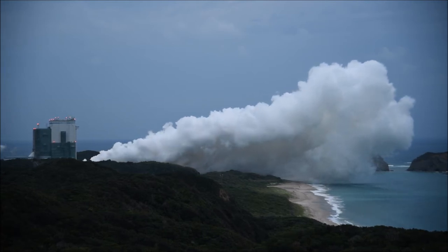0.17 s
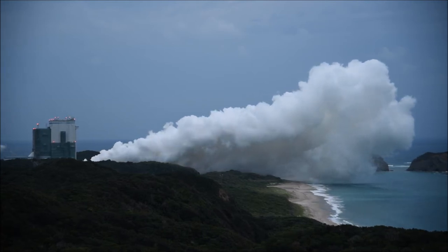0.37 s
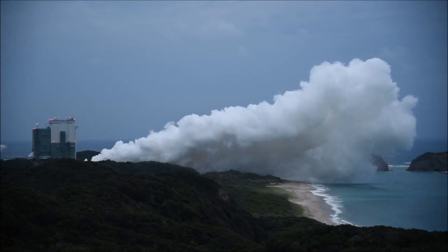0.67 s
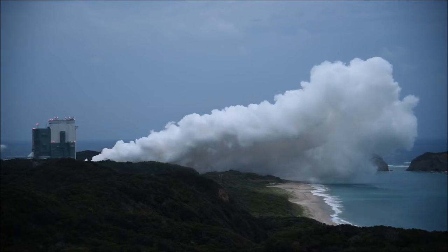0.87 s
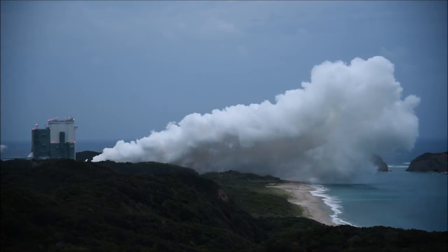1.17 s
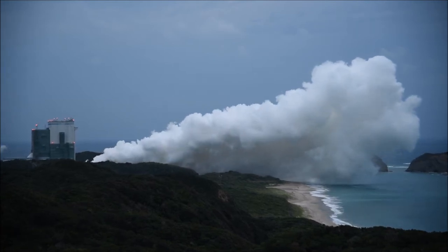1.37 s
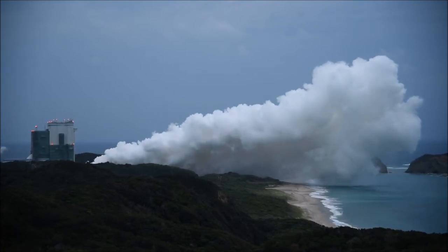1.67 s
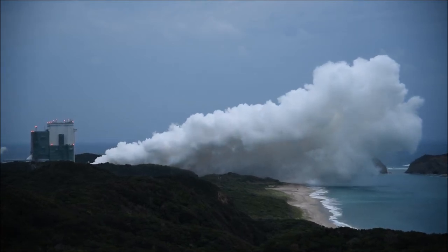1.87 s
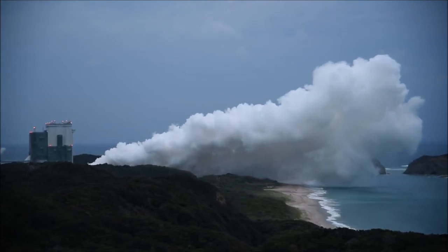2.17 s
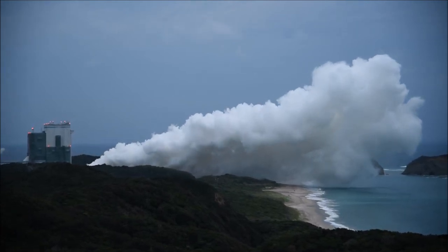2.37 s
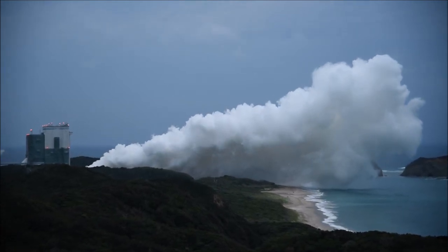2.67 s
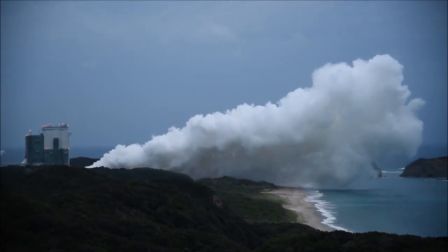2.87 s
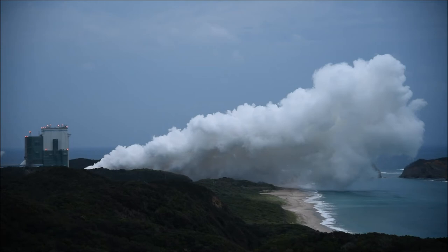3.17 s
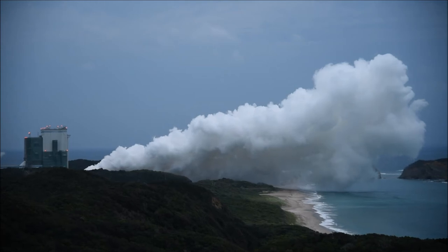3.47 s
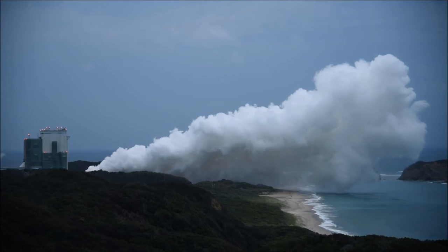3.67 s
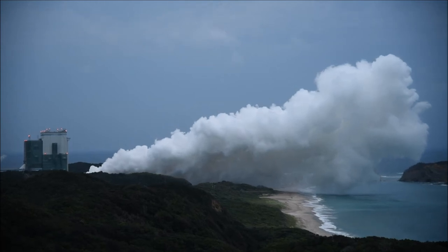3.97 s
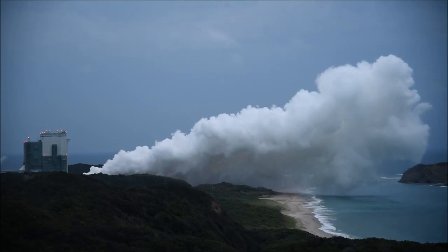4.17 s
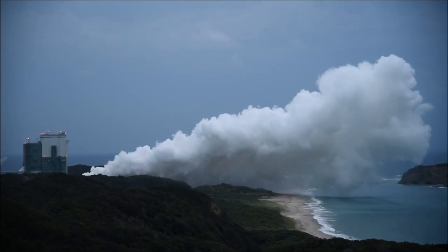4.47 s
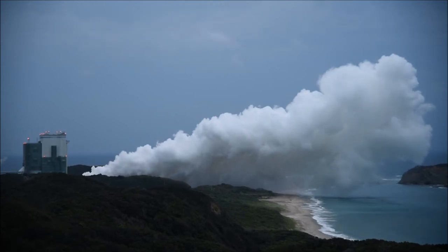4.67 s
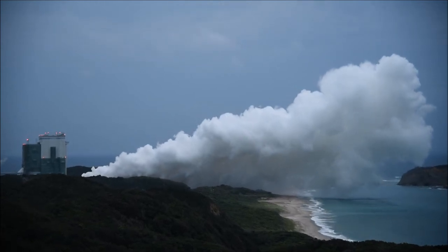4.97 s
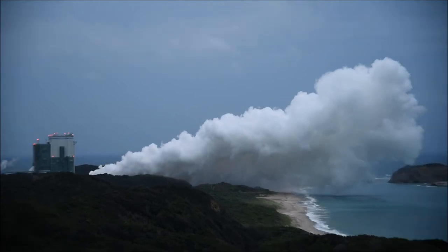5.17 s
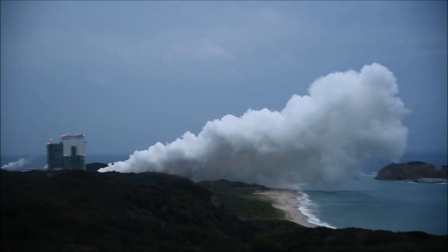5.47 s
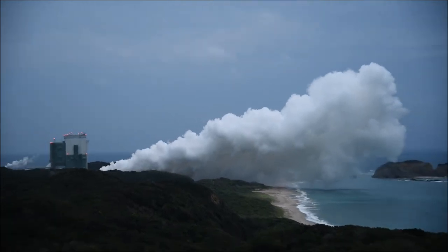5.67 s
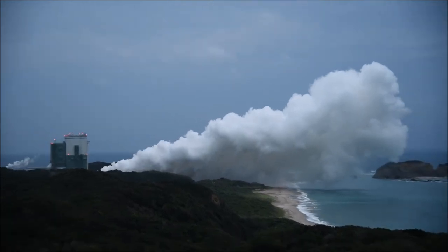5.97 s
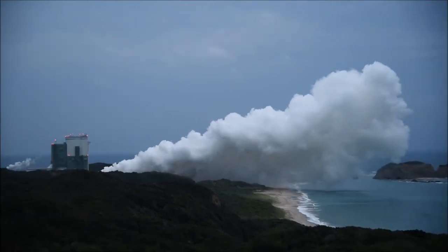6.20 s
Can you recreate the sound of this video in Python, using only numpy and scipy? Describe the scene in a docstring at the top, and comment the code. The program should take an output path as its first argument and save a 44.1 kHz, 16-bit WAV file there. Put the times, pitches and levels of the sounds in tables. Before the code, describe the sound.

Steady, loud, distant jet roar fills the whole stretch, starting and ending mid-burn. The low boom swells and sinks while the rushing body flutters finely, with a few tiny cracks in the first four seconds. Almost buried are high insect buzzing and trills, small grass snaps, faint hiss and a thin electronic whine. Open air, compact stereo microphone, mono bass and automatic level control.

```python
"""0 s: a rocket engine roars on a far test stand, dulled by the air, doubled by a bounce off near ground;
a katydid, two crickets, a faint high hiss and the camera's thin whine run under it. 0.1-4 s: steep fronts crack.
1.3-5.9 s: grass rustles and snaps. 5.7-6 s: the whine grows. 6.26 s: the katydid stops.
Jet, grass and hiss are shaped noise, cracks are shaped impulses, insects are chirps, the whine is a sine.
Gain control holds the roar level throughout."""
import sys
import numpy as np
from scipy import signal
from scipy.fft import rfft, irfft, next_fast_len
from scipy.io import wavfile
from scipy.ndimage import uniform_filter1d, minimum_filter1d, map_coordinates

SR = 44100
rng = np.random.default_rng(int(sys.argv[2]) if len(sys.argv) > 2 else 0)


def persist_wave(psi):
    """Save psi, clipped to +-1, as 16-bit WAV."""
    counts = np.round(np.clip(psi, -1, 1) * 32767).astype(np.int16)
    wavfile.write(sys.argv[1], SR, np.atleast_2d(counts).T)


N = 279594


def amp(db):
    """dB to amplitude factor."""
    return 10 ** (np.asarray(db) / 20)


def unit(x):
    """x at rms 1."""
    return x / np.sqrt(np.mean(x ** 2) + 1e-20)


def along(points, hz):
    """Each column after the frequency, read on a log axis."""
    f, *cols = np.transpose(points)
    return [np.interp(np.log(hz + 1), np.log(f + 1), c) for c in cols]


def curves(rows):
    """One value per sample for each column after the time."""
    s, *cols = np.transpose(rows)
    return [np.interp(np.arange(N) / SR, s, c) for c in cols]


def wobble(rate_hz):
    """Smooth random curve through rate_hz knots a second."""
    knots = rng.standard_normal(int(N * rate_hz / SR) + 4)
    return map_coordinates(knots, [np.arange(N) * rate_hz / SR])


def filtered(x, response):
    """x times a complex response of frequency."""
    m = next_fast_len(N + 8192)
    return irfft(rfft(x, m) * response(np.fft.rfftfreq(m, 1 / SR)), m)[..., :N]


def shaped(x, spectrum, floor_hz=0.79):
    """x through a spectrum closed to -120 dB at both ends."""
    closed = [(floor_hz, -120)] + list(spectrum) + [(SR / 2, -120)]
    return filtered(x, lambda hz: amp(along(closed, hz)[0]))


def coloured(x, spectrum):
    """Shaped x at rms 1."""
    return unit(shaped(x, spectrum))


def turbulence(patchy_db):
    """Two unrelated noises sharing time-frequency patches of random gain."""
    z = signal.stft(rng.standard_normal((2, N)), nperseg=1024)[2]
    field = rng.standard_normal(z.shape[1:])
    field = uniform_filter1d(field, size=10, axis=0)
    field = uniform_filter1d(field, size=12, axis=1)
    return signal.istft(z * amp(patchy_db * unit(field)), nperseg=1024)[1][:, :N]


# jet strength on arrival: t/s, level/dB
THRUST = [(0, -5.5), (1.4, -7.5), (2.2, -7), (3.3, -4.5), (3.8, -6), (4.3, -7), (5.2, -9), (5.7, -10.5),
          (6.34, -7)]
# ground path strength: t/s, level/dB
BOUNCE_LEVEL = [(0, -12.5), (.8, -15.5), (1.5, -11), (2.5, -10), (3.3, -13), (4, -10), (4.6, -21),
                (5.3, -12.5), (6.34, -21)]


def jet():
    """Roar as a direct and a scattered wave; a delayed, duller ground path combs the spectrum."""
    delay_s, low_hz, high_hz = 0.002558, 297, 1880
    thrust_db, = curves(THRUST)
    bounce_db, = curves(BOUNCE_LEVEL)
    roar = upper_roar() + deep_roar() + boom()

    def ground(hz):
        """Delay; the middle of the roar returns best."""
        lowpass = 1 / (1 + (hz / high_hz) ** 4)
        highpass = 1 / (1 + (low_hz / (hz + 1)) ** 4)
        return np.exp(-2j * np.pi * hz * delay_s) * lowpass * highpass

    echo = filtered(roar, ground)
    return amp(thrust_db) * (amp(-19.5) * (roar + amp(bounce_db) * echo) + cracks())


# band spectra: f/Hz, level/dB per Hz
BODY_SPECTRUM = [(240, -32.5), (320, -2.5), (440, 0.5), (520, -3), (610, -1), (660, -4.5), (830, -5.5),
                 (950, -12.5), (1300, -27)]
RUSH_SPECTRUM = [(650, -39.5), (900, -1), (1200, 1.5), (1400, -0.5), (1630, 0), (1780, -3.5), (2000, -5.5),
                 (2300, -9), (3200, -41.5)]
SIZZLE_SPECTRUM = [(1700, -12.5), (2300, -2.5), (2700, 1), (3300, -3), (4000, -11), (5000, -24.5),
                   (6000, -38), (7000, -49.5), (9000, -78.5)]
# upper band drift: t/s, lower body level/dB, upper body level/dB, rush level/dB, sizzle level/dB
UPPER_DRIFT = [(0, 0, -0.5, -0.5, -11), (.6, -1, -1, -1, -12.5), (1.1, -2, 2.5, -1.5, -9),
               (1.6, -1, -0.7, -0.5, -12.5), (2.3, -2, 3, 0.9, -12), (2.7, 1.5, -1, 0, -12.5),
               (3.1, 2, 0.5, 1.5, -13), (3.6, 2.2, 0, 0.5, -10), (4.3, -4.5, -0.5, -4.5, -15),
               (4.7, -2, 0.6, -1.7, -13.5), (5.2, -1, 0.5, -2, -12.5), (5.8, 2, 1.5, -2, -13),
               (6.34, -3.5, -1.5, -5, -16)]


def upper_roar():
    """Fine turbulence in body, rush and sizzle; sparse steep shocks add crackle to the top two."""
    split_hz, shocks_per_s = 550, 150
    lower_db, upper_db, rush_db, sizzle_db = curves(UPPER_DRIFT)
    eddies = amp(0.85 * wobble(120) + 0.082 * wobble(25))  # shakes all upper bands together
    fine = eddies * turbulence(patchy_db=0.5)
    hits = rng.random(N) < shocks_per_s / SR
    shocks = unit(hits * rng.exponential(1, N) * rng.choice([-1, 1], N))

    body = coloured(fine, BODY_SPECTRUM)
    below = filtered(body, lambda hz: 1 / (1 + (hz / split_hz) ** 12))
    rush = coloured(fine + amp(-13.5) * shocks, RUSH_SPECTRUM)
    sizzle = coloured(fine + amp(-10.5) * shocks, SIZZLE_SPECTRUM)
    roar = amp(lower_db) * below + amp(upper_db) * (body - below)
    return roar + amp(rush_db) * rush + amp(sizzle_db) * sizzle


# band spectra: f/Hz, level/dB per Hz
DEEP_SPECTRUM = [(15, -33), (25, -20.5), (33, -5.5), (41, 4), (50, -8), (60, 5.5), (75, -16.5),
                 (100, -28.5)]
GROWL_SPECTRUM = [(100, -36.5), (132, -0.5), (160, -4), (190, -4.5), (215, -20.5), (270, -39.5)]
LOW_SPECTRUM = [(150, -27), (195, 1), (260, 4), (315, -0.5), (350, -11.5), (450, -39.5)]
# low band swell: t/s, deep rumble level/dB, growl level/dB, low roar level/dB
LOW_SWELL = [(0, 1, -5, 0.5), (.4, -6.5, -11.5, -7.5), (.9, -2.5, -8.5, -5.5), (1.6, -4.5, -7.5, -8.5),
             (2.2, -3.5, -4.5, -5.5), (2.8, -13, -3.5, -2.5), (3.3, -7, -1.5, -2), (4.4, -11.5, -6, -7.5),
             (4.8, -5, -4.5, -8), (5.2, -7.5, -12, -10.5), (6.0, 0.5, -13, -9.5), (6.34, 1, -10.5, -7.5)]


def deep_roar():
    """Coarse turbulence: rumble, growl and low roar swell and sink separately."""
    spectra = DEEP_SPECTRUM, GROWL_SPECTRUM, LOW_SPECTRUM
    roar = 0
    for level_db, spectrum in zip(curves(LOW_SWELL), spectra):
        roar = roar + amp(level_db) * coloured(turbulence(patchy_db=0.6), spectrum)
    return roar


# boom spectra, lower and higher form: f/Hz, level/dB per Hz
BOOM_LOWER = [(50, -36), (70, -0.5), (100, 2.5), (114, 0.5), (132, -8), (170, -40)]
BOOM_HIGHER = [(60, -33), (85, -3), (113, 4), (124, -2), (138, -16.5), (180, -35)]
# boom surge and drift: t/s, level/dB, higher-form power share/0-1
BOOM_DRIFT = [(0, -5.5, 0.6), (.6, -2.5, 0), (1.2, 1, 0.37), (1.7, 0.5, 0.75), (2.3, 1.5, 0.46),
              (3, -1.5, 0.05), (3.3, 0.5, .2), (3.8, 2.5, 0.21), (4.15, -1, .2), (4.4, -3, 0.5),
              (4.65, -0.5, 0.96), (4.85, -2.5, 0.95), (5.05, -0.5, 0.7), (5.18, 3, 0.97), (5.3, 4.5, 1),
              (5.7, -1, 0.53), (6.05, -0.5, 0.2), (6.34, -8.5, 0.25)]


def boom():
    """Narrow low noise that surges and crossfades at equal power between two spectra."""
    level_db, share = curves(BOOM_DRIFT)
    share = np.clip(share, 0, 1)
    lower = coloured(turbulence(patchy_db=3.0), BOOM_LOWER)
    higher = coloured(turbulence(patchy_db=0.7), BOOM_HIGHER)
    return amp(level_db) * (np.sqrt(1 - share) * lower + np.sqrt(share) * higher)


# steepest fronts: t/s, level/dB
CRACK_TIMES = [(0.0983, -7), (1.4057, -3), (1.5016, -5), (1.8124, -6), (3.016, -6), (3.1095, -4),
               (3.2284, -4), (3.693, -4), (4.022, -4)]
# front spectrum: f/Hz, level/dB
FRONT_SPECTRUM = [(1000, -26.5), (2000, 3.5), (3500, 4), (5000, -13.5), (6500, -23), (8000, -40),
                  (10000, -70)]


def cracks():
    """Single steep fronts as shaped impulses: faint ticks above the roar."""
    blows = np.zeros(N)
    s, db = np.transpose(CRACK_TIMES)
    blows[np.round(s * SR).astype(int)] = -amp(db)
    return shaped(blows, FRONT_SPECTRUM, floor_hz=0.97)


# microphone pair: f/Hz, scattered re direct level/dB, left minus right level/dB, left lead/rad
MIC_PAIR = [(420, -39, -1.5, 0.032), (900, -20, 1, 0.21), (1300, -15, -1, 0.19), (1750, -12, -3, 0.59),
            (2100, -5, -3, 0.41), (3060, -10.5, 1, 1.38), (3200, -20.5, 4.5, 0.77), (3980, -9.5, 0.8, 0.38),
            (4900, -8, -2.5, 0.9), (5500, -4.5, 0, 0.67), (7000, -3, -4.5, 0.3)]


def heard(waves):
    """Direct sound reaches both ports alike, up to balance and lead; scattered sound splits them."""
    direct, scattered = waves

    def scatter(hz):
        return amp(along(MIC_PAIR, hz)[0])

    def tilt(hz):
        _, balance_db, lead_rad = along(MIC_PAIR, hz)
        return amp(balance_db / 2) * np.exp(.5j * lead_rad)

    split = filtered(scattered, scatter)
    left = filtered(direct + split, tilt)
    right = filtered(direct - split, lambda hz: 1 / tilt(hz))
    return np.array([left, right])


def strokes(count, duty, top_hz, fall_hz, bend, scatter_db):
    """Wing strokes: one falling chirp in each whole step of the running stroke count."""
    stroke = np.floor(count).astype(int)
    u = np.clip((count - stroke) / duty, 0, 1)
    chance = rng.standard_normal((stroke.max() + 1, 2))[stroke]  # loudness and pitch, per stroke
    hz = top_hz * (1 + 0.0086 * chance[:, 1]) - fall_hz * u ** bend
    phase = 2 * np.pi * np.cumsum(hz) / SR
    return unit(np.sin(np.pi * u) * amp(scatter_db * chance[:, 0]) * np.sin(phase))


def smeared(x, t60_s):
    """Leaves scatter a call differently toward each port: two decaying noise tails."""
    t = np.arange(SR // 8) / SR
    tail = rng.standard_normal((2, len(t))) * amp(-60 * t / t60_s)
    return unit(signal.fftconvolve(x[None], tail, axes=1)[:, :N])


# katydid wing strokes: t/s, rate/Hz
BUZZ_RATE_HZ = [(0.0, 112), (0.08, 111), (3.18, 110), (3.51, 109), (6.24, 109)]


def katydid():
    """Fast wing-stroke chirps, louder on the right and later on the left, until they stop."""
    end_s, left_lag_s = 6.255, .00007
    t = np.arange(N) / SR
    beats = np.cumsum(curves(BUZZ_RATE_HZ)[0]) / SR
    buzz = strokes(beats, duty=.8, top_hz=9750, fall_hz=1500, bend=.6, scatter_db=1.2) * (t < end_s)
    lag_s = np.array([[left_lag_s], [0]])
    direct = filtered(buzz, lambda hz: np.exp(-2j * np.pi * hz * lag_s))
    return amp([[-71.5], [-65]]) * direct + amp(-77) * smeared(buzz, t60_s=.04)


def crickets():
    """Two slower, lower wing-stroke trills: near one to the left, far one to the right."""
    t = np.arange(N) / SR
    near = strokes(32.07 * t + .62, duty=.55, top_hz=7670, fall_hz=600, bend=5, scatter_db=1.5)
    far = strokes(34.5 * t, duty=.55, top_hz=7620, fall_hz=850, bend=3.5, scatter_db=2)
    direct = near * amp([[-71.5], [-76.5]]) * [[1], [-1]]  # opposite polarity at the ports
    direct = direct + far * amp([[-81], [-77]])
    return direct + amp(-79) * smeared(near + far, t60_s=.06)


# rustles: t/s, level/dB, decay time constant/s
RUSTLES = [(1.345, -69, .03), (4.35, -67, .02), (4.825, -66, .03), (4.925, -68, 0.037), (4.99, -68, .02),
           (5.10, -66, .025), (5.165, -61, 0.046), (5.48, -68, .04), (5.82, -67, .03)]
# dry stalk snaps: t/s, level/dB
SNAPS = [(1.4087, -69), (1.715, -68), (2.106, -68), (2.745, -67), (3.014, -65), (3.1078, -62),
         (3.2455, -68), (3.4705, -66), (3.6243, -61), (4.8105, -68), (4.9212, -68), (4.999, -65),
         (5.1542, -67)]
# grass spectrum: f/Hz, level/dB per Hz
GRASS_SPECTRUM = [(5000, -27.5), (7000, 9), (8500, 11), (10000, 6), (12000, -10), (14300, -10.5),
                  (14600, -52.5)]


def grass():
    """Dry noise in short flickering rustles, and snaps with instant onset and fast decay."""
    rise_s, snap_decay_s = .012, .005
    t = np.arange(N) / SR
    swell, snaps = np.zeros(N), np.zeros(N)
    for s, db, decay_s in RUSTLES:
        after = np.maximum(t - s, 0)
        swell += amp(db) * (1 - np.exp(-after / rise_s)) * np.exp(-after / decay_s)
    for s, db in SNAPS:
        after = np.maximum(t - s, 0)
        snaps += amp(db) * (t >= s) * np.exp(-after / snap_decay_s)
    noise = coloured(rng.standard_normal((2, N)), GRASS_SPECTRUM)
    return (swell * amp(2.2 * wobble(300)) + snaps) * noise


def whine():
    """The camera's thin sine, unsteady in phase and level, louder late on."""
    whine_hz = 15716
    t = np.arange(N) / SR
    tone = np.sin(2 * np.pi * whine_hz * t + .5 * wobble(30)) * amp(1.5 * wobble(25))
    swell_db = np.interp(t, [5.7, 6.0], [0, 8.5])
    return tone * amp(swell_db) * amp([[-78], [-87]])


# hiss spectrum: f/Hz, level/dB per Hz
HISS_SPECTRUM = [(5000, -8), (6700, -3.5), (8000, 4), (10000, -10.5), (10600, -4), (11500, -7.5),
                 (14300, -9), (14600, -22.5), (15800, -17)]


def hiss():
    """Faint high hiss, flickering in patches: shaped noise with random gain over time and frequency."""
    return amp(-78.5) * coloured(turbulence(patchy_db=4.0), HISS_SPECTRUM)


def scene():
    """Sum of all sources at the two ports."""
    return heard(jet()) + katydid() + crickets() + grass() + whine() + hiss()


def record(dry):
    """Gain control lifts faint sounds as the roar eases; then mono bass, peak limiter, band limit."""
    slow_s, quick_s, mono_hz, ceiling, top_hz = .25, 0.033, 410, .9, 15830
    power = np.mean(dry ** 2, axis=0)
    slow = np.abs(uniform_filter1d(power, int(slow_s * SR)))
    quick = np.abs(uniform_filter1d(power, int(quick_s * SR)))
    wet = dry * amp(-12.5) / np.sqrt(slow) * (quick / slow) ** -.12

    mid, side = (wet[0] + wet[1]) / 2, (wet[0] - wet[1]) / 2
    side = filtered(side, lambda hz: 1 / (1 + (mono_hz / (hz + 1)) ** 16))
    wet = np.array([mid + side, mid - side])

    # limiter: gain ducks smoothly around the tallest peaks
    needed = np.minimum(1, ceiling / (np.abs(wet).max(axis=0) + 1e-9))
    held = minimum_filter1d(needed, size=401)
    wet = wet * uniform_filter1d(uniform_filter1d(held, size=200), size=200)
    return filtered(wet, lambda hz: hz < top_hz)


dry = scene()
out = record(dry)
persist_wave(out)
```